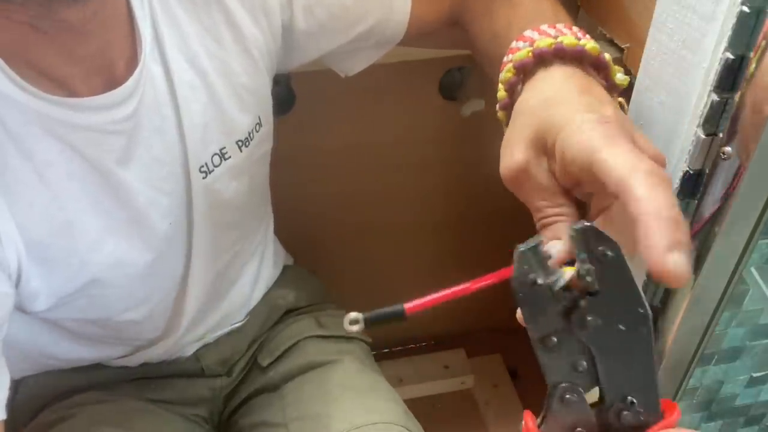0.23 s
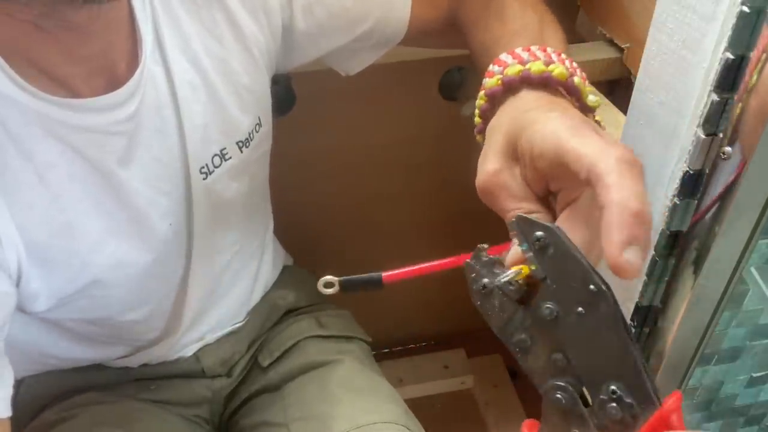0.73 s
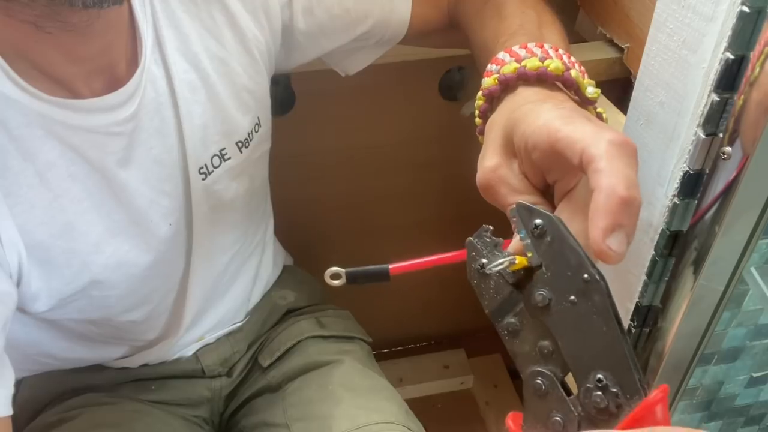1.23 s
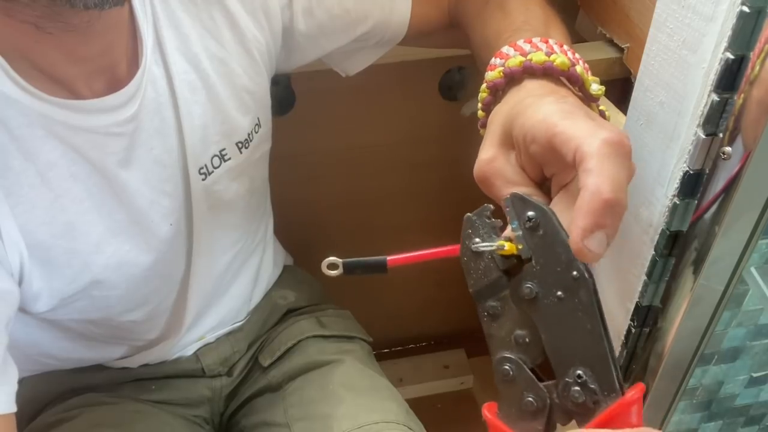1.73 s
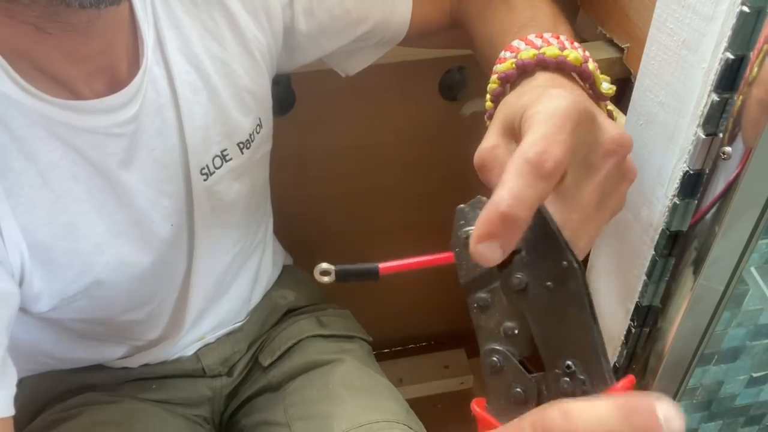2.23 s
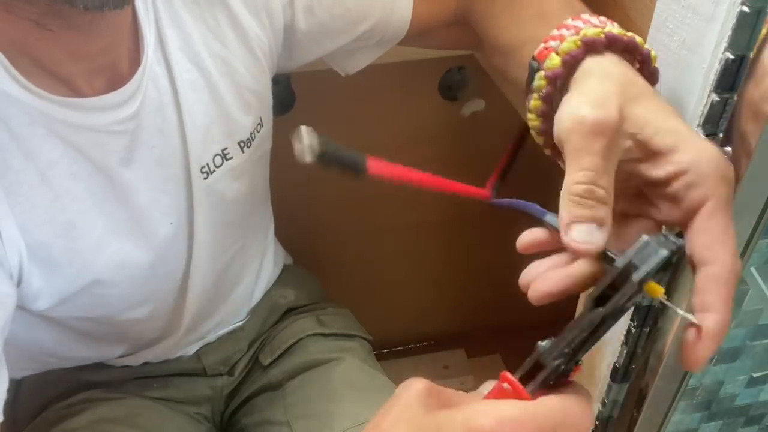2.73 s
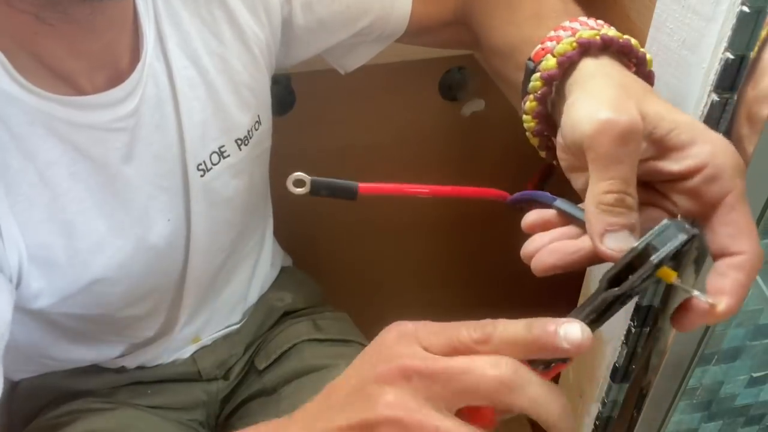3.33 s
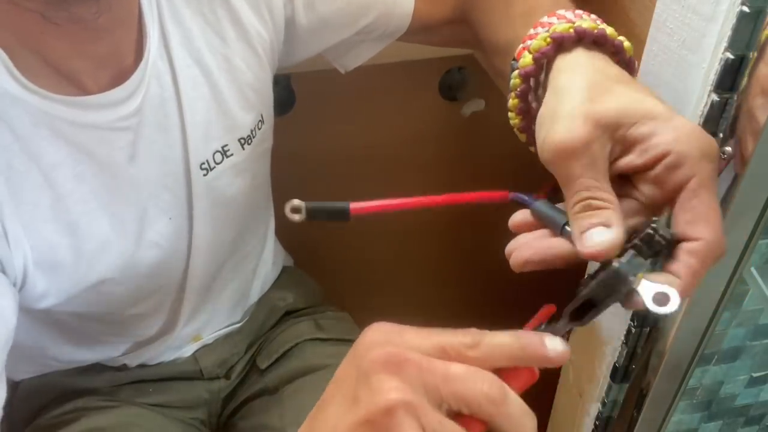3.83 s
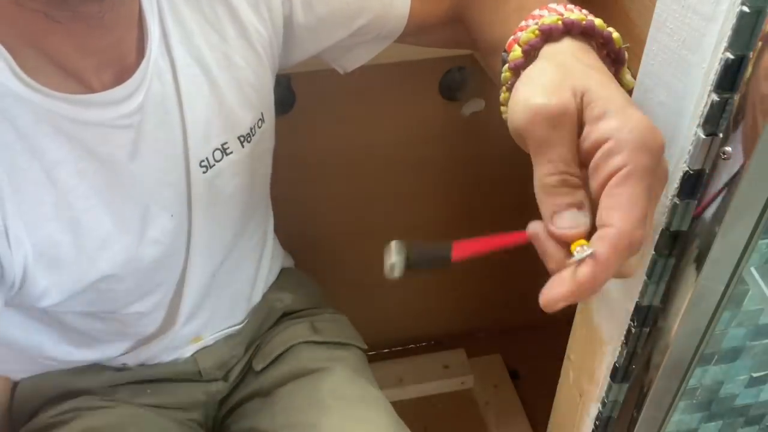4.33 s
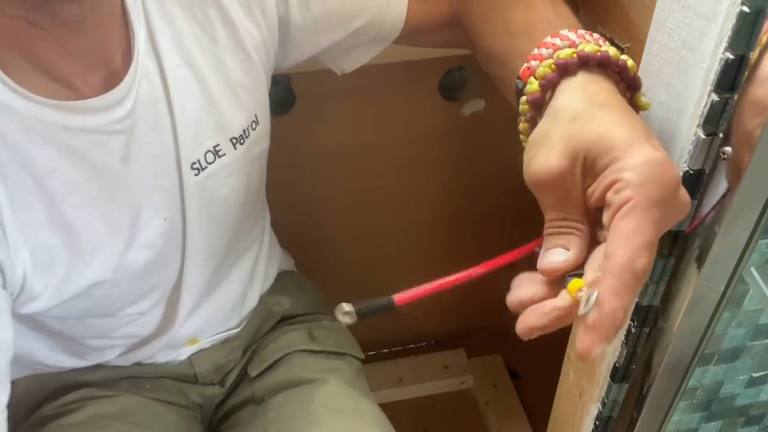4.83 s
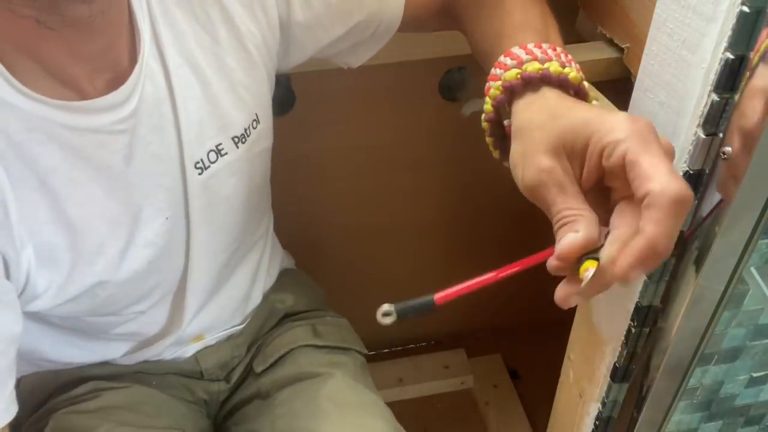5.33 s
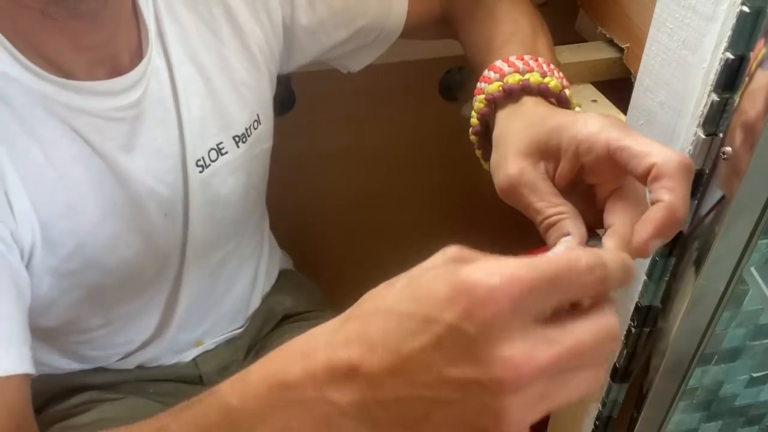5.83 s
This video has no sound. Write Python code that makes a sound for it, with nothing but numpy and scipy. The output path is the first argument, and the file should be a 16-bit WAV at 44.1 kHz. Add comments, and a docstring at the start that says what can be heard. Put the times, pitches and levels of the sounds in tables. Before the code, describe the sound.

Sparse sharp metal clicks, light scrapes and cloth rustle close up, a loud release rattle, then a heavy steel tool thuds and chatters onto wood.

```python
"""Crimping tool in a wooden cabin

A ratchet crimping tool is squeezed on a cable terminal in a cramped boat cabin: the pawl clicks over its
teeth and snaps free, the jaws rattle, then the tool drops and bounces. Steel and boards are sums of fading
sine waves, with snaps and noise bursts. Hands, cable and clothes rustle as filtered, grainy noise, over a
faint low rumble, a soft wash and a thin hiss, all of filtered noise."""
import sys
import numpy as np
from scipy import signal
from scipy.fft import rfft, irfft, next_fast_len
from scipy.io import wavfile

SR = 44100
rng = np.random.default_rng(int(sys.argv[2]) if len(sys.argv) > 2 else 0)


def to_wav(s):
    """Save 16-bit WAV."""
    ch = np.atleast_2d(s).T  # columns
    pcm = np.round(np.clip(ch, -1, 1) * 32767)  # PCM
    wavfile.write(sys.argv[1], SR, pcm.astype(np.int16))


N = 268564
TIME = np.arange(N) / SR

# All dB values are relative: later gains and filters also shape the final level.
# Pawl and jaws. Each row: start in seconds, level in dB, lows in dB, highs in dB, strongest resonance in Hz,
# second resonance in Hz, ringing of the other modes in dB, ringing of the strongest in dB, tail in dB,
# play of the jaws from 0 to 1.
CLICKS = [(1.385, -51, -31, -7.5, 9100, 5400, -6, 5, -4.5, 0),
          (1.518, -38.5, -4, -12, 3260, 2450, 0.5, -2, -6, 0),
          (1.718, -37.5, -4.5, -17, 6020, 4000, 3.5, 11, -3, 0),
          (1.9853, -19.5, -8.5, -12.5, 10280, 6050, -5.5, 21, -2, 0.1),
          (2.1341, -35, -10, -18, 2380, 2970, -2, 5, -8, 0.02),
          (3.632, -21, -4, -12.5, 2180, 5600, -2, 7.5, -7.5, 0.7),
          (3.636, -27.5, -2, -25, 5300, 2420, -30, -19, -4.5, 1),
          (3.7398, -30.5, -3, -20.5, 3290, 4250, -11, -3, -8.5, 1),
          (3.7774, -33.5, -19, -15.5, 7300, 3450, 1, 15, -1.5, 0.23),
          (3.8751, -33, -11, -18, 3320, 2690, -7, 7, -2.5, .8),
          (3.887, -31, -12.5, -7.5, 3415, 2680, 2, 12, -3.5, 0.9),
          (3.91, -36.5, -8, -27, 3370, 4260, -4, 4, 0, 0.7),
          (3.987, -36.5, -3, -17.5, 4760, 6240, -16, -6, 2.5, 1),
          (3.9909, -33.5, -9.5, -11.5, 5400, 9200, -13, 21, -4.5, .8),
          (4.022, -35, 0, -19.5, 4230, 2600, -22, -6, -3, 1)]
# Light touches of terminal and fingers on the tool. Each row: start in seconds, level in dB,
# strongest resonance in Hz.
TICKS = [(0.0898, -38.5, 5340), (0.1983, -42, 4130), (0.653, -52.5, 3750), (0.6885, -54, 3980),
         (0.777, -47, 4170), (0.871, -37, 2260), (0.8828, -36, 2280), (0.9028, -45.5, 4080),
         (1.111, -50.5, 4060), (1.15, -47.5, 4000), (1.4233, -47.5, 3070), (1.883, -48, 5850),
         (2.144, -37, 2900), (2.161, -52, 3450), (2.214, -46.5, 9600), (2.2555, -41.5, 3400),
         (2.359, -39.5, 3070), (2.46, -52, 9300), (2.513, -44.5, 6240), (2.601, -42.5, 9200),
         (2.7653, -33.5, 3360), (2.7893, -34.5, 3700), (3.725, -41, 5000), (3.826, -49, 8800),
         (4.869, -44, 1686), (5.396, -46, 2220), (5.949, -52, 6890)]
# Landings on the boards. Each row: start in seconds, boom in dB, knock in dB, clack in dB, steel in dB,
# favoured board pitch in Hz, strongest steel resonance in Hz, second steel resonance in Hz,
# ringing of the strongest in dB.
BOUNCES = [(4.462, -55, -43, -47, -47.5, 670, 1650, 5200, -8),
           (4.473, -37.5, -43.5, -43, -39.5, 453, 5250, 5300, 14),
           (4.978, -19, -14, -33, -28.5, 601, 5330, 3450, 18),
           (5.070, -27.5, -11, -31, -32.5, 934, 3300, 7500, 0),
           (5.135, -17, -20, -34.5, -44, 638, 1504, 3700, 0),
           (5.192, -34, -16, -43, -51.5, 364, 4140, 5300, 26),
           (5.222, -20.5, -23, -32, -35.5, 454, 1730, 2300, 0),
           (5.2266, -16, -14.5, -27, -23, 1055, 4075, 1880, 2),
           (5.256, -18, -17, -37.5, -39.5, 710, 4075, 5400, 13),
           (5.278, -21.5, -15, -37, -34.5, 482, 3400, 5200, -6),
           (5.302, -33, -25, -40.5, -54.5, 495, 4100, 5230, 2)]
# Soft bumps of hand and cable on the woodwork. Each row: start in seconds, level in dB, pitch in Hz.
BUMPS = [(0.195, -59.5, 700), (.451, -58.5, 283), (0.474, -60.5, 206), (2.5, -70, 124.8), (2.568, -64, 368),
         (2.707, -59, 1390), (2.718, -56, 402), (2.745, -59.5, 213), (6.073, -57.5, 217)]

# Modes (natural tones) of the tool's side plates and spring. Each row: pitch in Hz, level in dB,
# time to fade by 60 dB in seconds when nothing else damps it.
STEEL_MODES = [(2240, -7, .12), (2620, -21, .3), (2794, -16, .15), (3203, -9, .36), (3330, -7, .14),
               (3480, -12, .09), (3801, -6, .14), (4075, -12, .16), (4253, -9, .75), (4285, -17, .3),
               (5055, -15, .2), (5160, -10, .09), (5380, -12, .11), (5480, -14, .11), (6019, -3, .3),
               (6385, -9, .3), (7149, -13, .33), (7450, -13, .16), (7800, -20, .5), (8540, -19, .5),
               (8812, -9, .38), (9437, -12, .14), (9860, -13, .15), (10400, -16, .08), (10650, -18, .06)]
# Modes of the boards and the hollow under them. Each row: pitch in Hz, level in dB,
# time to fade by 60 dB in seconds.
BOARD_MODES = [(63, -13, .45), (79, -11.5, .4), (112, -14, .2), (123, -12, .3), (133, 0, .27),
               (174, -1, .22), (205, -6, .14), (263, -3.5, .2), (300, -5, .08), (341, -9.5, .13),
               (436, -4, .14), (489, -2, .15), (520, -3, .09), (604, -3, .15), (678, -10, .1),
               (935, -4, .1), (975, -4, .12), (1076, -4, .11), (1204, -14, .1), (1409, -12, .1),
               (1590, -7, .11), (1850, -6, .08), (2080, -10, .06), (2350, -12, .1)]

# Level of the rustle of hands and cloth, in four stretches. Each row: time in seconds, level in dB.
RUSTLE_LEVEL = [
    [(0.0, -61), (0.12, -73), (0.2, -69), (0.43, -80), (1.36, -83)],
    [(2.22, -77), (2.39, -69.5), (2.836, -66.5), (3.256, -88.5), (3.58, -60.5)],
    [(4.12, -73.5), (4.426, -66), (4.53, -76), (4.8, -69), (4.92, -65)],
    [(5.42, -69.5), (5.616, -63.5), (5.778, -71.5), (5.936, -79), (6.09, -74.5)],
]
# Sleeves swish as the arms move. Each row: middle in seconds, length in seconds, level in dB.
SWISHES = [(2.69, 0.058, -59.5), (3.41, 0.011, -64), (4.3, 0.09, -56), (5.5, 0.062, -54.5)]
# Short tugs work the terminal loose. Each row: middle in seconds, length in seconds, level in dB.
TUGS = [(0.3, 0.097, -66.5), (2.795, 0.028, -47.5), (2.918, 0.049, -57.5), (3.02, 0.055, -54.5),
        (3.131, 0.044, -61.5), (3.29, 0.097, -60), (3.48, 0.07, -62)]
# Dull rubs as the grip shifts. Each row: middle in seconds, length in seconds, level in dB.
RUBS = [(.25, 0.13, -66.5), (.55, 0.36, -64.5), (2.52, 0.13, -58.5), (2.722, 0.023, -49), (3.6, 0.16, -58),
        (5.56, 0.28, -56.5)]
# Swells of a soft, dull background wash. Each row: middle in seconds, length in seconds, level in dB.
WASHES = [(.62, 0.37, -64), (5.98, .14, -55.5)]

# Tone colour of a click on steel. Each row: frequency in Hz, level in dB per Hz.
CLICK_COLOUR = [(200, -33.5), (600, -14.5), (1200, -7), (2200, -2.5), (2750, -4), (3200, 1), (3800, -1.5),
                (5500, -3), (6900, 2.5), (8000, 4.5), (9300, 6), (10500, 3.5), (12000, 1.5), (14000, -12),
                (16000, -16)]
# Tone colour of the rustle, used for the hiss too. Each row: frequency in Hz, level in dB per Hz.
RUSTLE_COLOUR = [(300, -7), (1200, -9), (2500, -6.5), (4800, -4.5), (7000, -8.5), (10000, -9.5),
                 (11300, -10.5), (12300, -24), (16000, -35)]
# Tone colour of the sleeves. Each row: frequency in Hz, level in dB per Hz.
SWISH_COLOUR = [(1000, -24), (3000, -13), (5000, -2), (7000, -2), (10000, -4), (12300, -10), (16000, -41)]
# Tone colour of the tugs. Each row: frequency in Hz, level in dB per Hz.
TUG_COLOUR = [(900, -31), (1700, -9), (2600, -1), (4500, -6), (7000, -7.5), (10500, -9), (12300, -26)]
# Tone colour of the rubs. Each row: frequency in Hz, level in dB per Hz.
RUB_COLOUR = [(100, 5.5), (220, 2.5), (380, 0), (620, 1.5), (1200, -2), (1700, -17), (4000, -41.5)]
# Tone colour of the low rumble. Each row: frequency in Hz, level in dB per Hz.
RUMBLE_COLOUR = [(25, -12.5), (50, 1.5), (80, -4.5), (125, -13), (200, -14), (290, -24), (400, -19),
                 (520, -21), (750, -13), (1050, -13.5), (1500, -26.5), (2500, -36), (5000, -54.5)]
# Tone colour of the soft wash. Each row: frequency in Hz, level in dB per Hz.
WASH_COLOUR = [(350, -19.5), (620, 3.5), (1150, -1), (1600, -23), (4000, -52)]
# Dense, quickly dying modes of the planks. Each row: frequency in Hz, level in dB per Hz.
PLANK_COLOUR = [(100, -13.5), (300, -14), (620, -8.5), (780, -13), (1020, -23.5), (1280, -19.5),
                (1650, -18.5), (2500, -37.5), (6000, -55.5)]
# Treble tilt of the scattered tail: a lift near 11 kHz, duller above. Each row: frequency in Hz, level in dB.
REFLECTION_TILT = [(10800, 3.5), (12200, -3.5)]
# How alike left and right are. Each row: frequency in Hz, likeness from -1 (opposite) to 1 (same).
LIKENESS = [(30, 1), (150, 0.53), (400, 0.32), (800, -0.35), (1500, -0.095), (2500, 0.15), (5500, 0.045),
            (7500, 1), (9500, 0.77), (12500, 0.8)]

RUMBLE_DB, HISS_DB = -62, -85.5
# The snap of a contact, and its strongest and second resonance
SNAP_DB, RESONANCE_OCTAVES = 21.5, .1
SECOND_DB, SECOND_OCTAVES = 5, .13
GRIPPED_DB = -12  # ringing of the other steel modes at a light touch, the hand closed round the tool
# Fully loose jaws: how far the modes wander (share of their pitch), how often, and how soon they die
LOOSE_WANDER, LOOSE_SHIFTS_PER_S, LOOSE_T60_S = .012, 150, .2
DROPPED_PLAY = .4  # play of the jaws in the dropped tool, from 0 to 1
# After each landing the loose handles chatter twice, weaker and duller each time
CHATTER_S, CHATTER_LOSS_DB, CHATTER_DULLING_DB = 0.014, 9, 17.5
HANDLE_HZ = 4300  # the resonance that the chatter favours
PLANK_T60_S = .15
HOLLOW_HZ = 100  # modes below this belong to the hollow, and keep their level after the blow
LOW_CUT_HZ = 45  # low cut that keeps the thuds free of sub-bass
BENDING_DELAY_CYCLES = .6  # low bending waves cross slowly: modes start late by this part of a cycle
BUMP_DB_PER_OCTAVE = 13  # a bump's modes weaken with distance from its pitch
GRIP_S = .15  # the hands keep one grip for about this long
# Stereo widening: lateness of the left channel, and the range over which the effect sets in
WIDENING_LAG_S, WIDENING_HZ = .00016, (1100, 2200)
TOP_STOP_HZ = 16800  # from here up everything is at least 70 dB down


def from_db(db):
    """Turns decibels into a gain."""
    return 10 ** (np.asarray(db) / 20)


def at_hz(points, hz):
    """Reads a table of (Hz, value) on a log-frequency axis."""
    point_hz, value = np.transpose(points)
    return np.interp(np.log(np.maximum(hz, 1)), np.log(point_hz), value)


def add(out, s, sound):
    """Mixes a sound in from time s on."""
    start = round(s * SR)
    first = max(start, 0)
    part = sound[:, max(-start, 0):N - start]
    out[:, first:first + part.shape[1]] += part


def coloured(x, spectrum, extra_db=lambda hz: 0):
    """Filters with no pre-echo (minimum phase); without extra_db white noise keeps its power."""
    size = 2 * next_fast_len(x.shape[-1] // 2 + 2048)
    hz = np.fft.rfftfreq(size, 1 / SR)
    gain = from_db(at_hz(spectrum, hz))
    gain = gain / np.sqrt(np.mean(gain ** 2)) * from_db(extra_db(hz))
    # folding the cepstrum (transform of the log gain) puts the filter's response after its input
    cepstrum = irfft(np.log(gain))
    cepstrum[1:size // 2] *= 2
    cepstrum[size // 2 + 1:] = 0
    response = np.exp(rfft(cepstrum))
    return irfft(rfft(x, size) * response)[..., :x.shape[-1]]


def diffuse(size):
    """White noise from all round at two microphones: alike in bass, unlike in the middle, alike in treble."""
    padded = 2 * next_fast_len(size // 2 + 1)
    mid, side = rfft(rng.standard_normal((2, padded)))
    alike = np.clip(at_hz(LIKENESS, np.fft.rfftfreq(padded, 1 / SR)), -.99, .99)
    shared = np.sqrt((1 + alike) / 2) * mid
    opposite = np.sqrt((1 - alike) / 2) * side * [[1], [-1]]
    return irfft(shared + opposite)[:, :size]


def drift(per_s):
    """A slow random curve with a spread near 1, through per_s random points a second."""
    return np.interp(TIME * per_s, np.arange(8192), rng.standard_normal(8192))


def fade(t, t60):
    """Exponential decay of 60 dB in t60 seconds."""
    return np.exp(-np.log(1000) * t / t60)


def bell(hz, centre_hz, octaves=0.024):
    """A resonance's shape, 1 on top."""
    return 1 / (1 + (np.log2((hz + 1) / centre_hz) / octaves) ** 2)


def ripple(depth_db, spacing_hz):
    """Many short-lived resonances crowd together: chance peaks and dips, as a table of (Hz, dB)."""
    hz = 100 + np.arange(400) * spacing_hz
    db = depth_db * rng.standard_normal(len(hz))
    mean_power_db = 10 * np.log10(np.mean(from_db(db) ** 2))
    return np.column_stack([hz, db - mean_power_db])


def strokes(rows):
    """Each stroke swells and dies away along a smooth bell curve."""
    return sum(from_db(db) * np.exp(-2 * ((TIME - s) / length_s) ** 2) for s, length_s, db in rows)


def background():
    """A wavering low rumble shaped by the cabin's resonances, a soft wash that swells twice, a thin hiss."""
    waver_db = drift(9)
    resonances = ripple(depth_db=3, spacing_hz=45)
    # the resonances set in between 150 and 300 Hz
    cabin_db = lambda hz: at_hz(resonances, hz) * np.clip(hz / 150 - 1, 0, 1)
    # one extra second lets the filter settle and is cut off
    rumble = coloured(diffuse(N + SR), RUMBLE_COLOUR, cabin_db)[:, SR:]
    rumble = from_db(RUMBLE_DB + waver_db) * rumble
    wash = strokes(WASHES) * coloured(diffuse(N), WASH_COLOUR)
    hiss = from_db(HISS_DB) * coloured(diffuse(N), RUSTLE_COLOUR)
    return rumble + wash + hiss


def friction(colour, grain_db=1.5, grains_per_s=300):
    """Surfaces slide in tiny catches, heard through small resonances that change as the grip moves on."""
    catches = coloured(diffuse(N) * from_db(grain_db * drift(grains_per_s)), colour)
    out, step = np.zeros((2, N)), round(GRIP_S * SR)
    for start in range(-step, N, step):
        # each grip fades in while the one before fades out
        grip = np.clip(1 - np.abs(np.arange(N) - start - step) / step, 0, 1)
        resonances = ripple(depth_db=3.5, spacing_hz=90)
        first = max(start, 0)
        part = (catches * grip)[:, first:start + 2 * step]
        add(out, first / SR, coloured(part, resonances))
    return out


def rustle(cloth_db=4.0):
    """Hands and cloth rustle, sleeves swish, the grip rubs, and the terminal scrapes in the jaws."""
    s, db = np.vstack(RUSTLE_LEVEL).T
    level = from_db(cloth_db + np.interp(TIME, s, db))
    cloth = level * friction(RUSTLE_COLOUR, grain_db=2.5, grains_per_s=620)
    sleeves = strokes(SWISHES) * friction(SWISH_COLOUR)
    scrapes = strokes(TUGS) * friction(TUG_COLOUR)
    rubs = strokes(RUBS) * friction(RUB_COLOUR, grain_db=2.5, grains_per_s=120)
    return cloth + sleeves + scrapes + rubs


def steel_ring(t, favoured_hz, free_db, favoured_db, play, apart_hz=2500):
    """The contact singles out one mode or a close group; grip damps the rest, and play makes all wander."""
    hz, db, t60 = np.transpose(STEEL_MODES)[:, :, None, None]
    chance_db = 1.5 * rng.standard_normal(db.shape)
    distance = np.abs(np.log2(hz / favoured_hz))  # in octaves
    favoured = distance < min(distance.min() + .03, .1)
    strength = from_db(db + chance_db + np.where(favoured, favoured_db, free_db))
    # higher modes differ more between left and right
    channel_phase = hz / apart_hz * rng.uniform(-0.58, 1, (len(STEEL_MODES), 2, 1))
    phase = rng.uniform(0, 2 * np.pi, db.shape) + channel_phase
    # a time shift that changes at random bends the pitch up or down
    shift = np.cumsum(drift(LOOSE_SHIFTS_PER_S)[:len(t)]) / SR
    wander_s = play * LOOSE_WANDER * rng.choice([-1, 1], db.shape) * shift
    grip_damping = fade(t * ~favoured * np.clip(-free_db / 4, 0, 1.5), .2)
    damping = grip_damping * fade(t * play, LOOSE_T60_S)
    waves = np.sin((2 * np.pi * hz * (t + wander_s) + phase).astype(np.float32))
    return np.sum(damping * strength * fade(t, t60) * waves, axis=0)


def direct_snap(size, after_s=0.000892):
    """The straight path: one spike of unit energy at both microphones."""
    spike = np.zeros((2, size))
    spike[:, round(after_s * SR)] = 1
    return spike


def contact(lows_db, highs_db, resonance_hz, free_db, mode_db, tail_db, second_hz=None, play=0,
            crack_db=13, crack_t60=0.012, near_db=2, near_t60=0.12, cabin_db=-6.0, cabin_t60=0.24,
            ring_db=-8, peak_db=8, rise_s=0.0012, rattle_db=2):
    """A snap and crack on steel, a scatter off close panels, the cabin's short tail and the steel's ring."""
    t = np.arange(SR // 2) / SR
    attack = np.minimum(t / rise_s, 1)
    crack = from_db(crack_db) * fade(t, crack_t60) * attack
    near = from_db(near_db) * fade(t, near_t60)
    cabin = from_db(cabin_db) * fade(t, cabin_t60)
    # play in the joints roughens the tail further
    rough_db = rattle_db * (1 + play / 2) * drift(300)[:len(t)]
    tail = np.hypot(near, cabin) * attack * from_db(tail_db + rough_db)

    tilt = [(1500, lows_db), (3000, 0.018), (5500, 0.0031), (8500, highs_db + 3.0)]
    body = ripple(depth_db=2, spacing_hz=420)

    def tone(hz):
        """The click's balance of lows and highs, with its chance resonances and its chosen ones."""
        second = SECOND_DB * bell(hz, second_hz, SECOND_OCTAVES) if second_hz else 0
        strongest = peak_db * bell(hz, resonance_hz, RESONANCE_OCTAVES)
        return at_hz(tilt, hz) + at_hz(body, hz) + second + strongest

    reflections = ripple(depth_db=6.5, spacing_hz=95)
    scatter = coloured(diffuse(len(t)) * tail, reflections, lambda hz: at_hz(REFLECTION_TILT, hz))
    snap = from_db(SNAP_DB) * direct_snap(len(t))
    hit = coloured(snap + diffuse(len(t)) * crack + scatter, CLICK_COLOUR, tone)
    return hit + from_db(ring_db) * attack * steel_ring(t, resonance_hz, free_db, mode_db, play)


def crimper(tick_db=-11):
    """The pawl clicks and snaps free, the jaws rattle, and light touches tick: each is a contact on steel."""
    out = np.zeros((2, N))
    for s, db, lows_db, highs_db, resonance_hz, second_hz, free_db, mode_db, tail_db, play in CLICKS:
        click = contact(lows_db, highs_db, resonance_hz, free_db, mode_db, tail_db, second_hz,
                        np.clip(play, 0, 1))
        add(out, s, from_db(db) * click)
    for s, db, resonance_hz in TICKS:
        tick = contact(4.6, -19.0, resonance_hz, GRIPPED_DB, mode_db=-8.0, tail_db=-4.5, peak_db=11)
        add(out, s, from_db(db + tick_db) * tick)
    return out


def board_ring(share_db, rise_cycles=0.34, apart_hz=900, plank_db=-2, change_s=0.046, upper_db=-0.5,
               later_db=-1.5, swell_s=0.0016):
    """Boards under one blow, shared out by share_db(Hz): low modes arrive last, so the thud drops in pitch."""
    t = np.arange(SR) / SR
    hz, db, t60 = np.transpose(BOARD_MODES)[:, :, None, None]
    age = np.maximum(t - BENDING_DELAY_CYCLES / np.maximum(hz, HOLLOW_HZ), 0)
    # the two microphones hear the higher modes further out of step, up to a limit
    channel_phase = np.minimum(hz / apart_hz, np.pi / 4) * np.array([[1], [-1]])
    phase = rng.uniform(0, 2 * np.pi, hz.shape) + channel_phase
    swell = 1 - np.exp(-age * hz / rise_cycles)  # each mode builds up within about a cycle
    waves = np.sin(2 * np.pi * hz * age + phase)
    modes = from_db(db + share_db(hz)) * fade(age, t60) * swell * waves

    burst = diffuse(len(t)) * fade(t, PLANK_T60_S) * np.minimum(t / swell_s, 1)
    planks = coloured(burst, ripple(depth_db=6, spacing_hz=60))
    planks = coloured(planks, PLANK_COLOUR, lambda f: share_db(np.maximum(f, 450)))

    # level change of the upper modes after the blow: by later_db, around change_s
    change_db = upper_db + later_db * (1.5 - np.exp(-(t / change_s) ** 4))
    level_change = from_db((hz > HOLLOW_HZ) * change_db)
    sound = np.sum(level_change * modes, axis=0) + from_db(plank_db) * planks
    return signal.sosfilt(signal.butter(2, LOW_CUT_HZ, "high", fs=SR, output="sos"), sound)


def bumps(level_db=1, favour_db=8):
    """A soft bump wakes mainly the boards' modes near its pitch."""
    out = np.zeros((2, N))
    for s, db, pitch_hz in BUMPS:
        def near(hz):
            """Share of the bump at each frequency, in dB."""
            return favour_db * bell(hz, pitch_hz) - BUMP_DB_PER_OCTAVE * np.abs(np.log2(hz / pitch_hz))

        bump = board_ring(near, plank_db=8.5, upper_db=10, later_db=3.5, swell_s=0.012)
        add(out, s, from_db(level_db + db) * bump)
    return out


def dropped_tool(boards_db=4.0, lows_db=4, highs_db=-11, favour_db=7, lead_s=0.001005):
    """Each landing sets the boards going, by the spot that is hit; the steel clicks, rings and chatters."""
    out = np.zeros((2, N))
    for (s, boom_db, knock_db, clack_db, steel_db, favoured_hz,
         resonance_hz, second_hz, mode_db) in BOUNCES:
        shares = [(180, boom_db), (250, knock_db), (350, knock_db), (450, clack_db)]
        thud = board_ring(lambda hz: at_hz(shares, hz) + favour_db * bell(hz, favoured_hz))
        add(out, s - lead_s, from_db(boards_db) * thud)
        # k = 0 is the landing itself, then come two chatters of the handles
        for k in range(3):
            late_s = k * CHATTER_S * rng.uniform(.8, 1.2)
            click = contact(lows_db, highs_db - k * CHATTER_DULLING_DB, HANDLE_HZ if k else resonance_hz,
                            free_db=-21.5, mode_db=-15 if k else mode_db, tail_db=0.0,
                            second_hz=second_hz, play=DROPPED_PLAY, peak_db=6.5)
            add(out, s + late_s, from_db(steel_db - k * CHATTER_LOSS_DB) * click)
    return out


def widened(x):
    """Widens the stereo: in the treble the left channel is inverted and slightly late."""
    size = next_fast_len(N + SR // 10)
    hz = np.fft.rfftfreq(size, 1 / SR)
    amount = np.interp(hz, WIDENING_HZ, [0, 1])
    turn = amount * (np.pi - 2 * np.pi * hz * WIDENING_LAG_S)
    left = irfft(rfft(x[0], size) * np.exp(1j * turn), size)[:N]
    return np.array([left, x[1]])


def scene(left_db=.5):
    """Tool, boards and rustle over the cabin's background, all a little louder on the left."""
    mix = background() + rustle() + crimper() + bumps() + dropped_tool()
    return mix * from_db([[left_db], [-left_db]])


def record(dry):
    """The stereo is widened and the top is cut steeply."""
    steep_cut = signal.cheby2(12, 70, TOP_STOP_HZ, fs=SR, output="sos")
    return signal.sosfilt(steep_cut, widened(dry))


dry = scene()
out = record(dry)
to_wav(out)
```